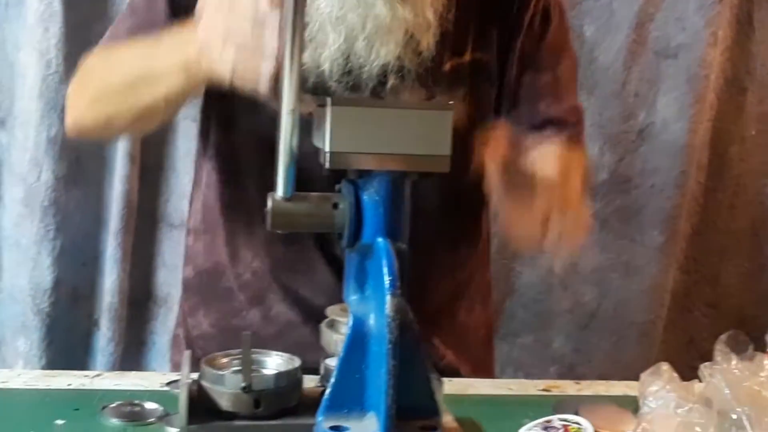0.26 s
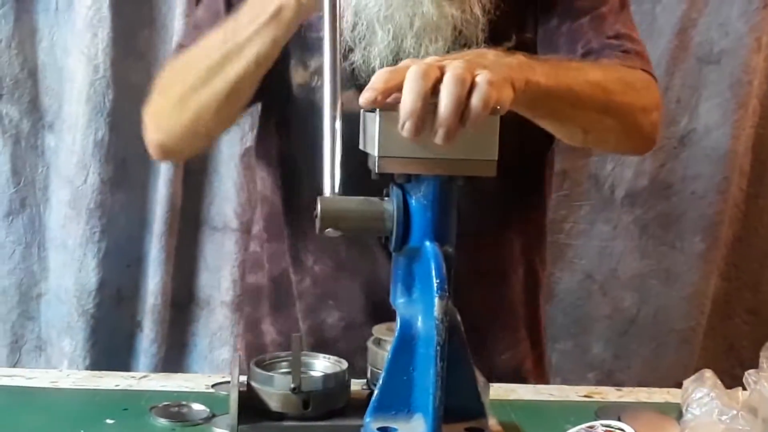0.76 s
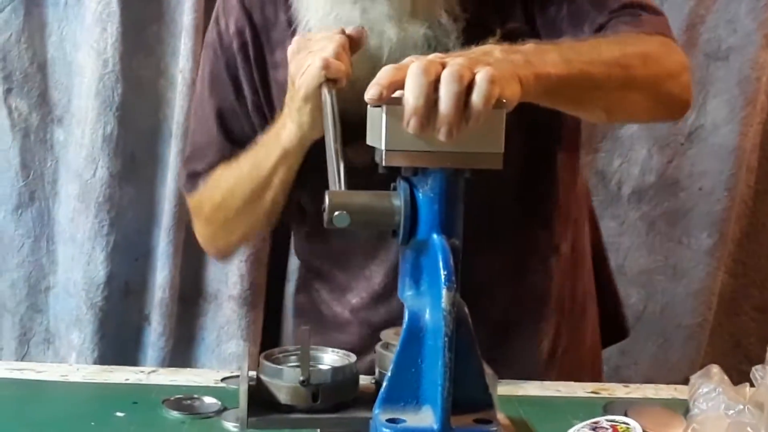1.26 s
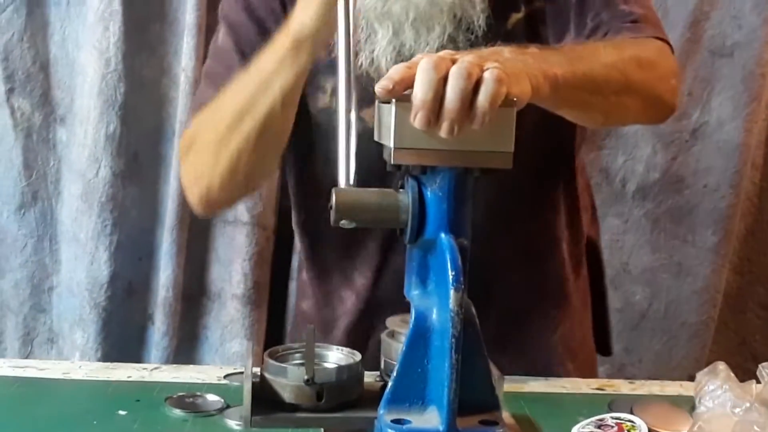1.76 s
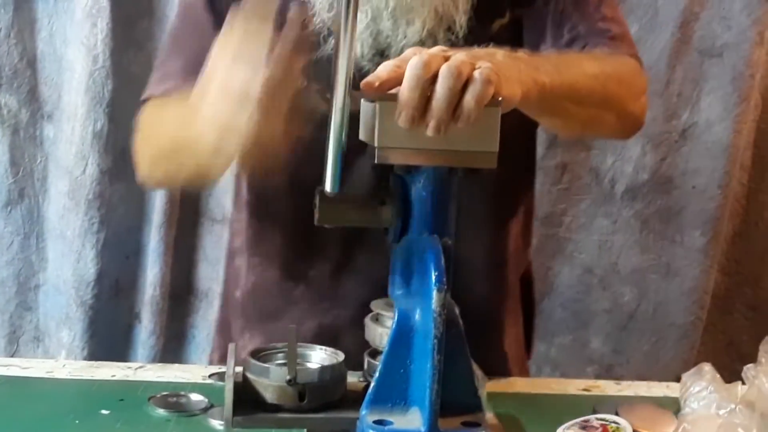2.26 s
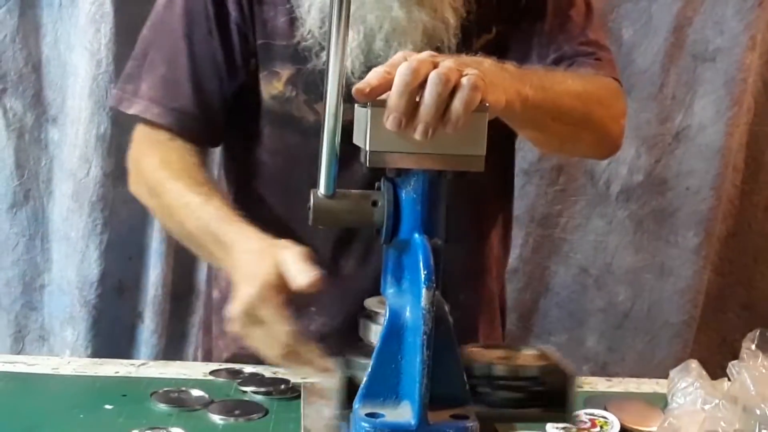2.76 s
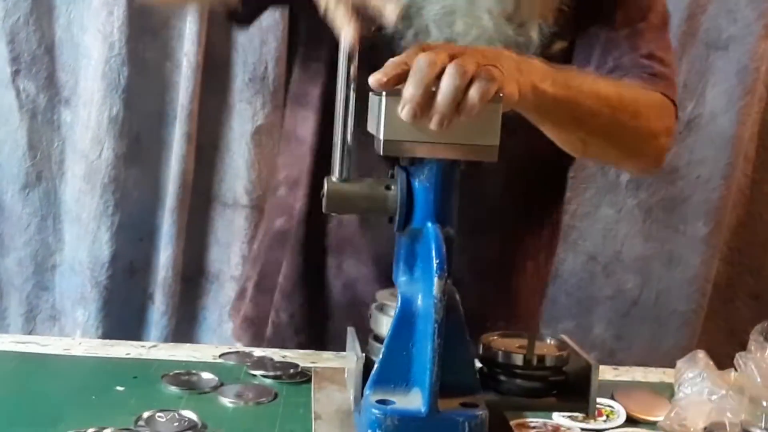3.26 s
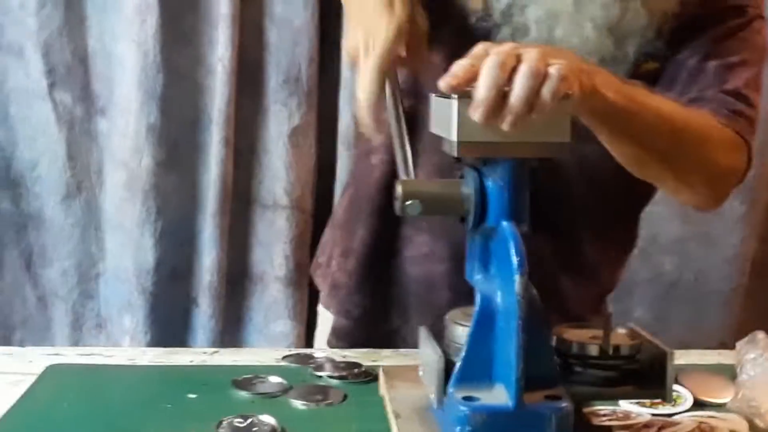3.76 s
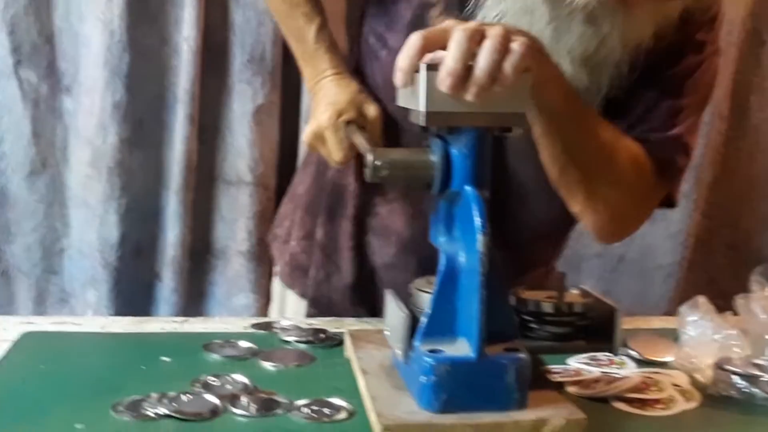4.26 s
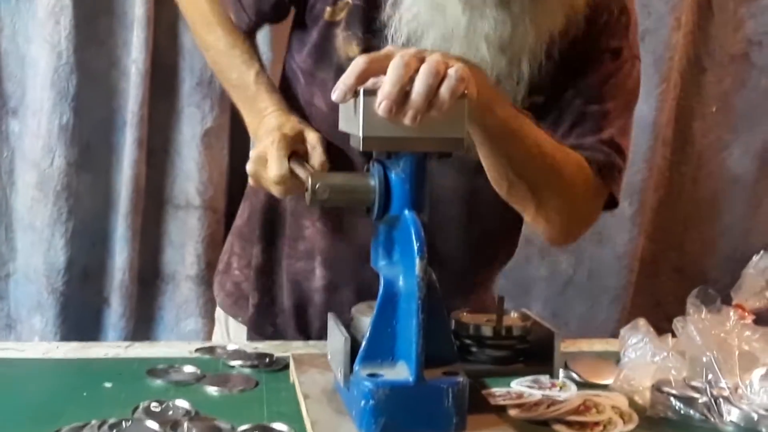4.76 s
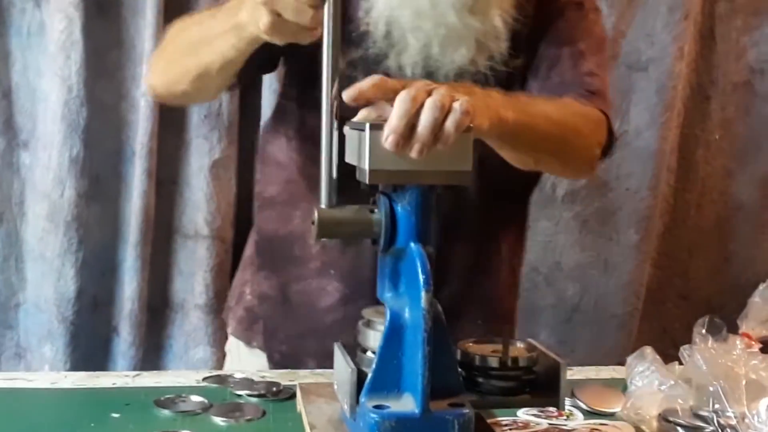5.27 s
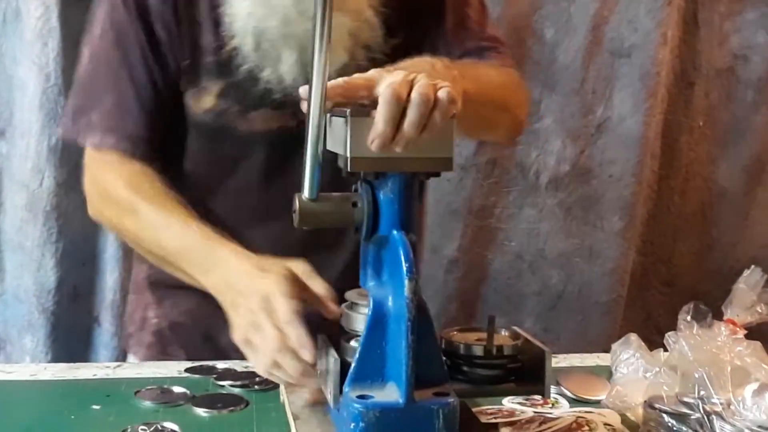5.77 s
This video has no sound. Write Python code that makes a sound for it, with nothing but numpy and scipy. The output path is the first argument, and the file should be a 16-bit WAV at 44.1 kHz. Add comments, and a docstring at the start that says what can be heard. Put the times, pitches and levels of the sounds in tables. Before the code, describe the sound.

Close steel clanks and hard slams with short rattles, a brief gritty crunch, then irregular knocks and faint scrapes over a low bench boom.

```python
"""A hand-lever badge press is worked on a wooden bench in a small room, close to a stereo microphone.
First the die carriage slides and slams home with a rattle; lighter knocks and a second slam follow.
The lever then crunches the badge shell in a few shoves; a faint breath-like hiss and a third slam come
next, then softer knocks, scrapes and hiss. Shaped noise makes the contacts, scrapes and hisses; decaying
sines make the steel ring and the bench boom. The room answers over a faint steady rumble and hiss."""
import sys
import numpy as np
from scipy import signal
from scipy.fft import rfft, irfft, next_fast_len
from scipy.io import wavfile
from scipy.ndimage import uniform_filter1d

SR = 44100
rng = np.random.default_rng(int(sys.argv[2]) if len(sys.argv) > 2 else 0)


def dump_mix(stems):
    """Bounce the given channels to the path in sys.argv[1] as a 16-bit WAV at rate SR."""
    frames = np.atleast_2d(stems).T  # one column per channel
    limited = np.clip(frames, -1, 1)  # hard clip at full scale
    pcm = np.round(limited * 32767).astype(np.int16)
    wavfile.write(sys.argv[1], SR, pcm)


N = 265261  # samples, about 6 s

# how alike left and right are in the direct sound: f/Hz, likeness (clipped to -1..1)
DIRECT_LIKENESS = [(300, 1.5), (1500, 0.9), (2500, 0.39), (5000, 0.2), (14000, -0.19)]
# how alike left and right are in the room sound: f/Hz, likeness
ROOM_LIKENESS = [(150, 0.97), (400, 0.94), (900, 0), (1800, 0.003), (14000, 0)]


def amp(db):
    """Decibels to gain."""
    return 10 ** (np.asarray(db) / 20)


def read(points, hz):
    """Joins (f/Hz, value) points on a log-frequency axis."""
    f, value = np.transpose(points)
    return np.interp(np.log(hz + 1), np.log(f + 1), value)


def add(mix, s, sound):
    """Mixes a stereo sound in at time s, cutting whatever falls outside the mix."""
    at = round(s * SR)
    sound = sound[:, max(-at, 0):]
    part = mix[:, max(at, 0):][:, :sound.shape[1]]
    part += sound[:, :part.shape[1]]


def pair(z, likeness, hz):
    """Blends two unrelated spectra into a left and right that are partly alike."""
    c = np.clip(read(likeness, hz), -1, 1)
    mid = np.sqrt((1 + c) / 2) * z[0]
    side = np.sqrt((1 - c) / 2) * z[1]
    return np.array([mid + side, mid - side])


def causal(db):
    """Minimum-phase response of a dB spectrum: it rings only after the blow."""
    log_gain = np.log(amp(np.concatenate([db, db[-2:0:-1]])))
    return np.exp(np.conj(signal.hilbert(log_gain)))[:len(db)]


def press_colour(levels_db, hz):
    """Spectrum in dB of one sound: press colour and the casting's damped resonances, tilted by its band levels."""
    # the bands that carry a sound's levels, from thump to top treble: f/Hz
    bands_hz = [140, 500, 2000, 6000, 12000]
    # colour of the whole press: f/Hz, level/dB
    press = [(25, -40), (60, -18), (85, -23.5), (115, -2.5), (250, -2.5), (600, -1.5), (1000, -6.5),
             (1900, -2), (2600, 4), (2900, -2.5), (3900, 3), (4700, -4), (6000, -3), (14500, -3)]
    # damped resonances of the cast frame and the trough between them: f/Hz, width/Hz, height/dB
    casting = [(378, 330, 4), (545, 110, -8.5), (675, 56, 0.5), (815, 99, 1.5), (995.5, 140, 9),
               (1476, 130, 4.5), (2300, 110, 2)]
    peaks_db = sum(db / (1 + (2 * (hz - centre) / width) ** 2) for centre, width, db in casting)
    return read(press, hz) + peaks_db + read(list(zip(bands_hz, levels_db)), hz)


def contact(main_hz, level_db, treble_db, thump_db):
    """Five band levels of one touch: hard faces add treble, a heavy push adds thump, both relative to its level."""
    # a touch with a higher resonance has less body and more edge: 3.5 dB per octave around 1430 Hz
    lean_db = 3.5 * np.log2(main_hz / 1430)
    top_fall_db = 1.5  # the lower treble band lies this far over the treble level, the top band this far under
    return level_db + np.array([thump_db, -lean_db, lean_db, treble_db + top_fall_db, treble_db - top_fall_db])


def slam_contacts():
    """Heavy steel parts slam home; each slam throws off weakening rebounds that rattle."""
    # slams: t/s, main resonance f/Hz, level/dB, treble/dB re level, thump/dB re level,
    # rattle length/s, rattle start/dB re level
    slams = [(0.0412, 2300, 22.5, -22, -14.5, .13, -7), (0.9655, 1400, 21, -10, 3.5, 0.077, -10.5),
             (2.8621, 2300, 21, -16, -2.5, .12, -1)]
    slam_chatter_s, rebound_chatter_s = .0045, 0.0033
    rebound_count = 12
    fall_db, fall_bend, spread_db = 25, 1.33, 4.5  # the fall steepens as the rattle goes on
    rattle_hz, rattle_octaves = 2300, 0.46  # rebounds resonate up to this far either side
    rebound_treble_db = 1  # relative treble added to the slam's
    rows = []
    for s, main_hz, level_db, treble_db, thump_db, length, rattle_db in slams:
        rows.append((s, slam_chatter_s, main_hz, level_db, treble_db, thump_db))
        for k, (late, hard, place) in enumerate(rng.uniform(-1, 1, (rebound_count, 3))):
            part = (k + 1 + .3 * late) / rebound_count
            rebound_db = level_db + rattle_db - fall_db * part ** fall_bend + spread_db * hard
            rebound_hz = rattle_hz * 2 ** (rattle_octaves * place)
            rows.append((s + length * part, rebound_chatter_s, rebound_hz,
                         rebound_db, treble_db + rebound_treble_db, thump_db))
    return rows


def lever_ticks(count=6):
    """Light, bright ticks while the lever takes up its play, one at a random moment in each equal step."""
    from_s, to_s = .79, 1
    rows = []
    for k, (late, hard) in enumerate(rng.random((count, 2))):
        s = from_s + (to_s - from_s) * (k + late) / count
        rows.append((s, .0015, 3600, -42.5 + 6 * hard, 14, 0))
    return rows


def knock(decay, main_hz, levels_db, size=8192, peak_db=9.5, width=0.092, rise=0.00083, grain_db=3, hold=1.1):
    """Steel faces chatter briefly and shake the frame; returns the sound towards the microphone and all round."""
    t, hz = np.arange(size) / SR, np.fft.rfftfreq(size, 1 / SR)
    envelope = np.exp(-(t / max(decay, 1e-4)) ** hold) * (1 - np.exp(-t / rise))
    slaps = amp(grain_db * np.repeat(rng.uniform(-1, 1, size // 32), 32))
    chatter = rfft(rng.standard_normal((2, size)) * envelope * slaps)
    # the chatter itself has no broad colour, so its smoothed spectrum is levelled
    power = uniform_filter1d(abs(chatter) ** 2, size=50, axis=1)
    chatter = chatter * np.array([causal(-10 * np.log10(p + 1e-12)) for p in power])
    touched = pair(chatter, DIRECT_LIKENESS, hz) * causal(press_colour(levels_db, hz))
    # each point of contact beams some of the many upper modes at the microphone; all round, that evens out
    mode_number = 18 * np.log1p(hz / 1500)
    spot_db = np.interp(mode_number, np.arange(64), 3.5 * rng.standard_normal(64) - 1)
    spot_db = spot_db * np.clip(hz / 900, 0, 1)
    beam_db = spot_db + peak_db / (1 + ((hz - main_hz) / (width * main_hz)) ** 2)
    towards = irfft(touched * causal(beam_db))
    around = irfft(touched * causal(0.19 * beam_db))
    return towards, around


def press_contacts():
    """Lever, ram and dies touch: knocks, slams with rebounds and ticks, towards the microphone and all round."""
    # single contacts: t/s, chatter decay/s, main resonance f/Hz, level/dB, treble/dB re level, thump/dB re level
    knocks = [(0.642, 0.012, 372, -15.5, -47, 8), (0.6881, 0.005, 1480, 6, -23.5, -6),
              (0.718, .012, 1440, 6.5, -23.5, 7), (0.7779, 0.005, 956, 3, -29, -19),
              (0.9609, 0.01, 860, 19, -13.5, -3), (1.0647, .0014, 1790, -10.5, 7.5, -13),
              (1.068, .004, 890, 9.5, -28, -8), (1.091, 0.011, 1404, 11, -22, -27),
              (1.125, 0.0096, 1010, 11, -39, -3), (1.149, 0.0015, 2760, 12.5, -29.5, 2.5),
              (1.307, 0.01, 2920, 4, -16, 21), (1.525, 0.0038, 2000, -9, -15.5, -4),
              (1.652, 0.0074, 391, -14.5, -32, 9), (1.823, 0.0028, 1530, 10, -24, 0.5),
              (1.8463, 0.0034, 1720, 9, -24.5, -13), (2.039, 0.0053, 1315, 10, -21.5, 2),
              (2.045, 0.0072, 347, 2.5, -38, -1), (2.665, 0.004, 1480, 12.5, -35.5, -13),
              (2.829, .0034, 840, 6, -33, -20.5), (2.8363, 0.013, 1104, 24.5, -19.5, -26.5),
              (3.231, 0.0026, 1050, -18.5, -33.5, 6), (3.3805, 0.0039, 1583, 5.5, -25.5, 0),
              (3.496, 0.018, 1010, -1, -42.5, -25), (3.5412, 0.0042, 4030, -2, -8.5, -26.5),
              (3.5655, 0.0034, 1560, 11, -24, 1.5), (3.797, 0.025, 734, -7, -17.5, 12),
              (3.8328, 0.0031, 1380, 6, -56, 5), (3.839, .0056, 2080, 8.5, -14.5, -4),
              (4.091, 0.0058, 2250, -11, -16, -6.5), (4.686, 0.014, 2120, -7, -10.5, -26),
              (4.7139, 0.001, 3750, 0, -11.5, -7), (5.0506, 0.0071, 686, 11.5, -32, -12),
              (5.0615, 0.0062, 2000, 15.5, -21, -19), (5.068, 0.007, 680, 14.5, -39.5, 1),
              (5.1885, 0.0058, 2100, 4, -37, 5), (5.196, .0033, 980, 10.5, -24, -16.5),
              (5.355, .003, 350, -15, -14.5, 7.5), (5.4555, 0.0087, 392, 8, -25, -5.5),
              (5.923, .0087, 963, -7, -36.5, 0.5), (5.963, 0.01, 1035, -4, -49, 13)]
    towards, around = np.zeros((2, 2, N))
    for s, decay, main_hz, level_db, treble_db, thump_db in list(knocks) + slam_contacts() + lever_ticks():
        beamed, spread = knock(decay, main_hz, contact(main_hz, level_db, treble_db, thump_db))
        add(towards, s, beamed)
        add(around, s, spread)
    return towards, around


def stroke(rise, fall, levels_db, main_hz=1000, half_width_hz=1000, peak_db=0, slip_db=3.5, edge_db=20):
    """Coloured noise, roughened by tiny uneven slips, swells and fades."""
    t = np.arange(0, rise + fall, 1 / SR)
    size = 2 * next_fast_len(len(t) // 2 + 2048, True)  # leaves room for the resonances to ring out
    hz = np.fft.rfftfreq(size, 1 / SR)
    swell = amp(np.interp(t, [0, rise, rise + fall], [-edge_db, 0, -edge_db]))
    swell = swell * signal.windows.tukey(len(t), .1)
    draws = rng.standard_normal((3, 2 * SR))
    slips = amp(slip_db * np.interp(t * 380, np.arange(2 * SR), np.tanh(draws[2])))  # 380 slips per second
    slips = slips / np.sqrt(np.mean(slips ** 2))
    z = rfft(draws[:2, :len(t)] * swell * slips, size)
    resonance_db = peak_db / (1 + ((hz - main_hz) / half_width_hz) ** 2)
    return irfft(pair(z, DIRECT_LIKENESS, hz) * causal(press_colour(levels_db, hz) + resonance_db))


def scrapes_and_breaths(trim_db=-1, thump_db=-5.5):
    """Steel scrapes and faint breath-like hisses: each swells and fades around one resonance."""
    # scrapes and hisses: strongest at t/s, swell/s, fade/s, resonance f/Hz, half width/Hz, height/dB,
    # level/dB before the trim, treble/dB re level
    swells = [(0.014, 0.067, 0.046, 750, 300, 5, -20.5, -19.5),
              (0.796, 0.045, 0.52, 443, 400, 16, -52.5, -5), (1.839, .01, 0.036, 740, 910, 17.5, -25, -5.5),
              (2.44, .12, 0.22, 3770, 350, 14.5, -45, -16.5), (3.545, 0.063, 0.054, 881, 900, 8, -26, -14),
              (4.059, 0.11, 0.13, 1540, 896, 12.5, -52, -14), (4.421, .24, 0.62, 2230, 615, 6.5, -52, -7.5),
              (4.92, .045, 0.069, 1860, 1000, 21.5, -36.5, -14.5),
              (5.48, .012, 0.049, 1000, 900, 14.5, -34.5, -4)]
    mix = np.zeros((2, N))
    for s, rise, fall, main_hz, half_width_hz, peak_db, level_db, treble_db in swells:
        levels_db = trim_db + level_db + np.array([thump_db, 0, 0, treble_db, treble_db])
        add(mix, s - rise, stroke(rise, fall, levels_db, main_hz, half_width_hz, peak_db))
    return mix


def badge_crunches():
    """The badge shell crumples in a few shoves; folding sheet slips more unevenly than a scrape."""
    # shoves: strongest at t/s, swell/s, fade/s, main resonance f/Hz, level/dB,
    # treble/dB re level, thump/dB re level
    crunches = [(1.02, 0.053, 0.35, 1410, -27.5, -7.5, 8), (1.199, .06, 0.15, 1210, -27.5, -8.5, -9),
                (1.312, .014, .1, 2580, -23, -16.5, 7), (1.384, .031, 0.032, 447.7, -41, -30, 6),
                (1.46, 0.061, 0.23, 2500, -43.5, -15, 8.5)]
    mix = np.zeros((2, N))
    for s, rise, fall, main_hz, level_db, treble_db, thump_db in crunches:
        levels_db = contact(main_hz, level_db, treble_db, thump_db)
        crunch = stroke(rise, fall, levels_db, main_hz, half_width_hz=820, peak_db=3.5, slip_db=5.5)
        add(mix, s - rise, crunch)
    return mix


def ringing(modes, blows, focus_db, rise=0.0013, count=5):
    """Each blow wakes the modes near one pitch; a loosely seated part splits each into close, beating lines."""
    mix, t = np.zeros((2, N)), np.arange(SR // 2) / SR
    hz, db, t60 = np.repeat(modes, count, axis=0).T
    split_hz = rng.uniform(-1, 1, len(hz)) * (20 + .006 * hz)
    decay_and_turn = 2j * np.pi * (hz + split_hz) - np.log(1000) / t60
    waves = np.exp(decay_and_turn[:, None] * t) * (1 - np.exp(-t / rise))
    for s, level_db, brightest_hz in blows:
        share = amp(db - focus_db * abs(np.log2(hz / brightest_hz)))  # focus in dB per octave
        share = share / np.linalg.norm(share)
        a, b, c, d = rng.standard_normal((len(hz), 4)).T
        phase = np.angle(pair([a + 1j * b, c + 1j * d], DIRECT_LIKENESS, hz))
        ring = (share * np.exp(1j * phase)) @ waves
        add(mix, s, amp(level_db) * np.sqrt(2) * ring.real)
    return mix


def first_die_rings():
    """The first die rings at its own modes, only lightly focused by where each blow lands in pitch."""
    # modes: f/Hz, relative level/dB, t60/s
    modes = [(972, -10, .25), (1350, -11, .25), (1440, -12, .25), (2132, -5, .3), (2213, -3, .3),
             (2325, -5, .3), (2465, 0, .27), (2530, -1, .27), (2612, -2, .3), (3240, -12, .25),
             (3460, -14, .25), (3924, -16, .22)]
    # blows: t/s, level/dB, brightest f/Hz
    blows = [(.043, -15, 2426), (.066, -25, 2366), (0.964, -33, 1400), (1.149, -31, 2420)]
    return ringing(modes, blows, focus_db=1.5)


def second_die_rings():
    """The second die rings at its own modes, more focused in pitch than the first."""
    # modes: f/Hz, relative level/dB, t60/s
    modes = [(830, -8, .25), (1200, -7, .25), (1450, -5, .25), (1835, -8, .22), (2005, 0, .27),
             (2055, -3, .27), (2125, -2, .27), (2285, -4, .28), (2435, -3, .27), (2590, -6, .25),
             (3250, -13, .22), (3590, -10, .22), (3714, -12, .22), (6611, -13, .33), (6790, -15, .33),
             (15210, -25, .15)]
    # blows: t/s, level/dB, brightest f/Hz
    blows = [(2.863, -20.5, 3680), (2.885, -12, 2065), (2.893, -26, 7000), (3.567, -62, 1984)]
    return ringing(modes, blows, focus_db=7)


def ram_rings():
    """The ram rings at a few high modes, each blow strongly focused on one pitch."""
    # modes: f/Hz, relative level/dB, t60/s
    modes = [(3246, -8, .22), (5820, 0, .36), (5950, -3, .3), (10740, -1, .25), (14890, 2, .2)]
    # blows: t/s, level/dB, brightest f/Hz
    blows = [(.966, -40, 6000), (1.847, -42, 10200), (2.041, -52, 10200), (2.864, -37, 6000),
             (3.566, -52.5, 5800), (3.839, -42, 13800), (3.841, -41, 5900), (5.192, -52.5, 5910)]
    return ringing(modes, blows, focus_db=23)


def bench(x):
    """The bench top and base plate ring on at their own low modes."""
    # modes: f/Hz, gain/dB, t60/s
    bench_modes = [(111, -8.5, 0.31), (136.4, 7, 0.39), (175, 3, 0.08), (236.5, -3, 0.13),
                   (344.3, -0.5, 0.31), (396.3, -3, 0.42), (866, -2, 0.091)]
    t = np.arange(SR // 2) / SR
    rings = 0
    for hz, db, t60 in bench_modes:
        rate = np.log(1000) / t60
        rings = rings + amp(db) * 2 * rate / SR * np.exp(-rate * t) * np.sin(2 * np.pi * hz * t)
    return signal.oaconvolve(x, rings[None], axes=1)[:, :N]


def bench_rocks():
    """The bench rumbles as the press is leant on or let go."""
    # rumbles: strongest at t/s, swell/s, fade/s, level/dB
    rocks = [(0.581, 0.032, 0.074, -31), (2.19, 0.086, 0.11, -28), (2.632, 0.074, 0.03, -36),
             (4.059, 0.096, .16, -37), (4.825, .087, 0.89, -31), (5.48, 0.0097, 0.048, -20),
             (5.981, .064, 0.039, -19)]
    # their colour in the five bands, thump to top treble: level/dB
    rock_colour = [-1.5, -14.5, -34.5, -46.5, -42.5]
    mix = np.zeros((2, N))
    for s, rise, fall, level_db in rocks:
        add(mix, s - rise, stroke(rise, fall, level_db + np.array(rock_colour)))
    return mix


def room(x, gap=0.0016, build=0.0072, size=32768):
    """Diffuse reflections of a small room, each band dying at its own speed."""
    # decay: f/Hz, t60/s
    room_t60 = [(100, 0.58), (300, 0.48), (800, 0.36), (2200, 0.3923), (5000, 0.3069), (13000, 0.29)]
    # tail: f/Hz, level/dB
    room_db = [(100, -9.5), (300, 0), (800, -0.5), (2200, -2.5), (5000, -2.5), (13000, -9)]
    hz, t, z = signal.stft(rng.standard_normal((2, size)), SR, nperseg=256)
    rate = np.log(1000) / read(room_t60, hz)[:, None]
    z = z * np.exp(-rate * t) * np.sqrt(2 * rate / SR) * amp(read(room_db, hz))[:, None]
    tail = signal.istft(z, SR, nperseg=256)[1][:, :size]
    tail = irfft(pair(rfft(tail), ROOM_LIKENESS, np.fft.rfftfreq(size, 1 / SR)))
    tail *= np.clip((np.arange(size) / SR - gap) / build, 0, 1)  # reflections build up after a short gap
    return signal.oaconvolve(x, tail, axes=1)[:, :N]


def air(level_db=-61.5):
    """Faint steady rumble and hiss of the room: coloured noise set to one overall level."""
    # colour: f/Hz, relative level per Hz/dB
    air_colour = [(15, -60.5), (25, -9.5), (64, -17.5), (127, 1.5), (212, -14.5), (335, -9.5), (641, -15),
                  (1890, -12), (2160, -6.5), (3080, -20.5), (3920, -20), (4610, -26.5), (10400, -28),
                  (14800, -20.5), (16000, -30.5)]
    hz = np.fft.rfftfreq(next_fast_len(N, True), 1 / SR)
    z = rng.standard_normal((2, len(hz))) + 1j * rng.standard_normal((2, len(hz)))
    noise = irfft(pair(z, ROOM_LIKENESS, hz) * amp(read(air_colour, hz)))[:, :N]
    return amp(level_db) * noise / noise.std()


def scene():
    """Contacts and swelling noises feed the bench modes, steel parts ring, and the room answers."""
    towards, around = press_contacts()
    strokes = scrapes_and_breaths() + badge_crunches() + bench_rocks()
    rings = bench(around + strokes)
    rings += first_die_rings() + second_die_rings() + ram_rings()
    return towards + strokes + rings + room(around + strokes + rings) + air()


def record(dry, ceiling=1.4, size=294912):
    """Each microphone has its own colour; loud peaks overload softly; then the treble is band-limited."""
    # balance of the two microphones: f/Hz, left minus right/dB
    balance_db = [(250, 0.5), (600, 1), (1500, 1), (2300, 3), (4500, 4.5), (8000, 2), (13000, -4.5)]
    tilt_db = read(balance_db, np.fft.rfftfreq(size, 1 / SR)) / 2
    heard = irfft(rfft(dry, size) * amp([tilt_db, -tilt_db]))[:, :N]
    heard = ceiling * np.tanh(heard / ceiling)
    low_pass = signal.firwin(511, 16000, window=("kaiser", 9), fs=SR)  # edge at 16 kHz
    return signal.oaconvolve(heard, low_pass[None], "same")


dry = scene()
out = record(dry)
dump_mix(out)
```